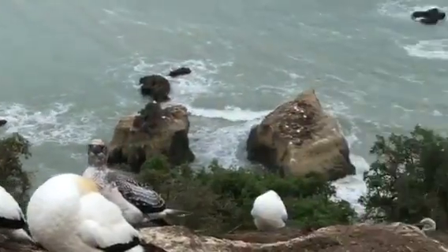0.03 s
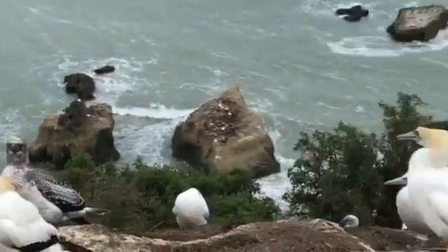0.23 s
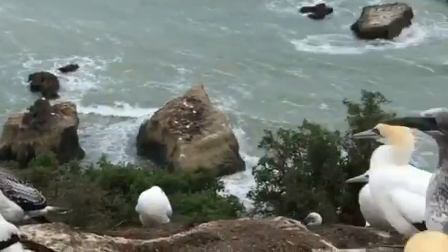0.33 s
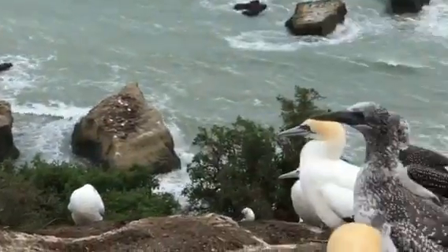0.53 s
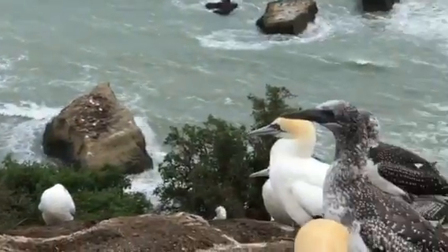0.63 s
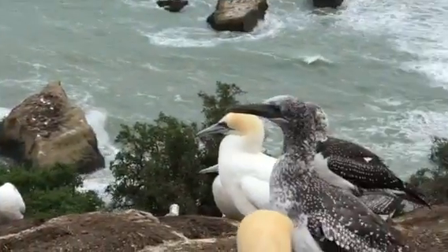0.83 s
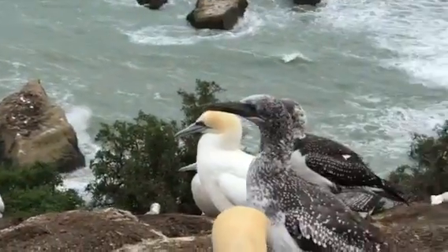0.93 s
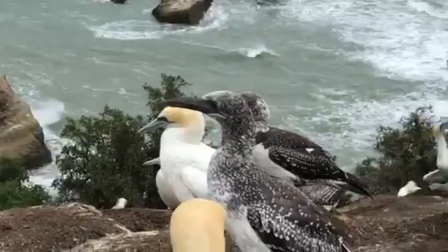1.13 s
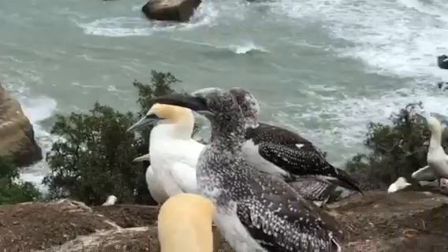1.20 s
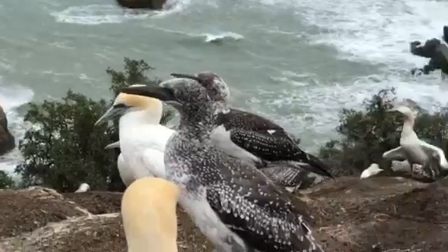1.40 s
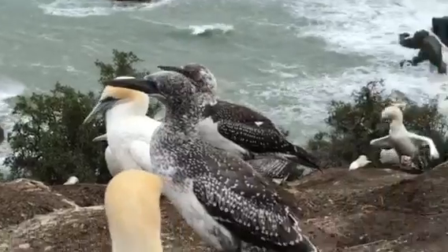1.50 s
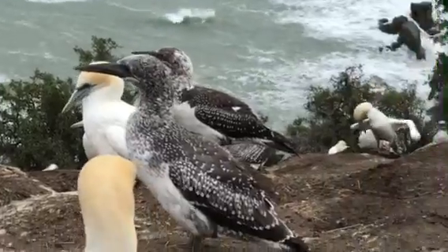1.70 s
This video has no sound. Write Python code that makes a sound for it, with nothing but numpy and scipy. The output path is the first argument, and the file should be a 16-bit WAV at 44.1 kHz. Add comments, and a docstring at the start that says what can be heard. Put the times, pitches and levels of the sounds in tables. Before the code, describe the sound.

Seabirds call close by in a colony for under two seconds. A bill clacks at 0.1 seconds, a croak follows at 0.2, then short harsh yaps come about every 0.3 seconds. Another bird peeps thinly five or six times a second, among pips and dry rasps. Wind rumbles on the microphone, thumping and popping most around 0.7 and 1.0 to 1.2 seconds. Faint surf and far birds continue throughout.

```python
"""A near seabird croaks and yaps in a clifftop colony, while another repeats a thin arched peep.
Neighbours add short pips, dry rasps and bill clacks over the babble of far birds.
Each call is a buzz from the bird's voice box, mixed with breath and shaped by its throat.
Behind the birds, surf washes far below and wind rumbles, thumps and pops on the microphone."""
import sys
import numpy as np
from scipy import signal
from scipy.fft import rfft, irfft
from scipy.io import wavfile
from scipy.ndimage import uniform_filter1d

SR = 44100
rng = np.random.default_rng(int(sys.argv[2]) if len(sys.argv) > 2 else 0)


def unload_audio(sound):
    """Save the sound as a 16-bit wav file, at the path given as the first command line argument."""
    columns = np.transpose(np.atleast_2d(sound))
    # keep every value between -1 and 1, then stretch to whole-number steps
    steps = np.round(np.clip(columns, -1, 1) * 32767)
    wavfile.write(sys.argv[1], SR, steps.astype(np.int16))


N = 77175

# The near bird's yaps: start t/s, length t/s, first pitch f/Hz, last pitch f/Hz, level/dB,
# treble tilt/(dB per octave), even harmonics/dB, roughness/(0-1), top sheen/dB, fade-out t/s
YAP_NOTES = [(0.232, 0.046, 919, 850, -42, 4, -0.5, 0.17, -8, 0.0065),
             (0.450, 0.06, 965, 989, -35.5, 8, 7.5, 0.08, -3.5, 0.012),
             (0.747, 0.033, 1069, 1039, -45, 2.5, 3, 0.05, 3, 0.011),
             (.988, 0.059, 1027, 952, -41.5, -4, 0, 0.18, -6, .011),
             (1.278, 0.059, 929, 822, -36, -1, 2.5, 0.14, 8.5, 0.027),
             (1.594, 0.023, 1014, 1036, -39.5, -3.5, -4, 0.27, 0, .006),
             (1.661, 0.017, 1103, 1126, -39.5, -17, -18, 0.33, 0, .006)]
# Arched peeps: start t/s, length t/s, top pitch f/Hz, level/dB
PEEP_NOTES = [(0.032, 0.054, 2270, -44), (0.201, 0.058, 2266, -41.5), (0.381, 0.056, 2234, -45),
              (0.558, 0.062, 2233, -46), (0.733, 0.056, 2200, -49.5), (0.922, 0.051, 2208, -50),
              (1.096, .053, 2230, -46), (1.28, 0.043, 2250, -44), (1.456, 0.059, 2260, -47),
              (1.64, 0.057, 2230, -43)]
# Neighbours' pips: start t/s, length t/s, first pitch f/Hz, last pitch f/Hz, level/dB,
# treble tilt/(dB per octave), even harmonics/dB, roughness/(0-1)
PIP_NOTES = [(.007, 0.022, 1855, 1756, -42, 14, -9, 0.45), (0.027, 0.027, 1985, 1882, -37, 12, -2, 0.16),
             (.09, 0.025, 1937, 1850, -40.5, -12, 7, 0.14), (0.157, 0.027, 1802, 1840, -33, 9, 4, 0.16),
             (0.561, 0.024, 1840, 1610, -36, 4, 4.5, 0.24), (0.612, 0.038, 2040, 1825, -48, -19, -3, 0.42),
             (0.641, 0.011, 1820, 1776, -40, 3.5, 25, 0.12),
             (0.703, 0.029, 1733, 1834, -39.5, -2, 17.5, 0.2),
             (1.073, 0.027, 2367, 2510, -44, -8, -8, 0.57), (1.096, .025, 2014, 1877, -37.5, -2, 10, 0.26),
             (1.161, .031, 1992, 1810, -37, -6, 12, 0.24), (1.577, 0.024, 1532, 1580, -35.5, -2, 9, 0.05)]
# Dry rasps: start t/s, length t/s, level/dB, treble tilt/(dB per octave)
RASP_NOTES = [(0.027, 0.023, -45, -4.5), (0.071, 0.026, -40, -6), (0.089, 0.027, -45.5, 2),
              (0.14, 0.016, -38.5, -5.5), (0.21, 0.024, -49, 10), (0.258, .019, -51, -6),
              (0.444, 0.011, -39, -15), (0.494, 0.011, -47.5, 12), (.536, .03, -46, -2.5),
              (1.145, .018, -44, -14), (1.232, 0.017, -41, -12.5), (1.585, .014, -50, 2.5),
              (1.658, .023, -48, -6.5), (1.683, 0.026, -46, -23)]
# Bills snapping shut: start t/s, level/dB
BILL_CLACKS = [(.078, -31.5), (0.141, -51)]
# How the throat colours each kind of call: f/Hz, relative level/dB
CROAK_COLOUR = [(480, -31), (950, -13.5), (1420, 0), (1900, -10.5), (2380, -34), (2850, -13), (3350, -18),
                (4100, -29), (5100, -20), (6200, -24.5), (7500, -32), (10000, -41.5), (15500, -56)]
YAP_COLOUR = [(450, -18), (950, -1.5), (1850, 1.5), (2850, -6.5), (3500, -8), (3950, -7), (4550, -22),
              (5400, -17), (6900, -22), (7800, -35.5), (8600, -28), (9900, -37), (10800, -44.5),
              (12800, -39), (15500, -62)]
PEEP_COLOUR = [(1000, -27), (1650, -1.5), (2200, -4.5), (3300, -1.5), (3800, -10), (4500, -22),
               (5400, -8.5), (6700, -35), (9000, -48), (13400, -38), (15500, -52)]
PIP_COLOUR = [(900, -29), (1550, 4.5), (2000, 10.5), (3500, -15), (5400, -21), (7300, -40.5), (15500, -65)]
RASP_COLOUR = [(500, -16), (900, -3.5), (1150, -39), (1500, 7.5), (1900, -9.5), (2600, -12), (3700, -9.5),
               (4800, -18), (6200, -14.5), (8000, -20), (10500, -37.5), (15500, -52)]
# How loud a typical far call is over time: t/s, level/dB
BABBLE_LEVELS = [(0, -57.5), (.35, -57.5), (.85, -60), (1.25, -56), (1.75, -55.5)]
# How hard the wind presses on the microphone: t/s, level/dB
WIND_LEVELS = [(0, -37), (.18, -37.5), (0.209, -30.5), (.35, -28.5), (0.638, -24), (0.678, -18.5),
               (.73, -25), (.79, -37.5), (.84, -37.5), (0.881, -23), (.94, -34), (1.02, -32),
               (1.108, -21.5), (1.16, -26.5), (1.232, -21), (1.25, -38), (1.35, -29.5), (1.55, -29.5),
               (1.59, -38.5), (1.75, -36)]
# The tone of the wind's rumble: f/Hz, relative level/dB
RUMBLE_COLOUR = [(20, -10), (38, -28.5), (55, 1.5), (85, -2.5), (130, -4), (220, -11), (320, -25),
                 (500, -37), (1000, -42.5), (3000, -91)]
# Thumps of wind: start t/s, length t/s, level/dB, treble cutoff f/Hz
WIND_THUMPS = [(.512, 0.037, -27.5, 412), (.6, 0.02, -29, 277), (0.668, 0.024, -14.5, 199),
               (0.688, 0.043, -24.5, 306), (0.808, 0.023, -34, 262), (0.879, 0.027, -32, 166),
               (1.006, 0.022, -26.5, 230), (1.05, 0.03, -19.5, 186), (1.192, 0.038, -28.5, 306),
               (1.221, 0.018, -27, 210), (1.35, 0.046, -27.5, 253), (1.395, 0.019, -29.5, 380),
               (1.469, 0.017, -35.5, 372)]
# Sharp pops of wind: middle t/s, peak level/dB, width t/s
WIND_POPS = [(0.672, -11, 0.0013), (.694, -17.5, 0.00027), (1.188, -17.5, 0.00037), (1.225, -22.5, 0.00035),
             (1.237, -17.5, 0.001)]
# The tone of the surf: f/Hz, relative level/dB
SURF_COLOUR = [(40, -22.5), (250, 7), (500, 3.5), (900, -6), (1300, -2.5), (2000, -20), (2800, -13),
               (3800, -14.5), (7000, -26.5), (10000, -37), (15500, -45.5)]

ATTACK_S, RELEASE_S = 0.0064, 0.0068  # a note's usual fade-in and fade-out
TREBLE_HZ, SHEEN_HZ, EDGE_HZ = 3100, 9900, 15750  # where treble starts, sheen starts and sound ends


def croak(start=.203, length=.043, peak_s=0.013):
    """A loud note at about half the pitch of a yap, which peaks early and dies away."""
    note = call(CROAK_COLOUR, length, first_hz=476, last_hz=467.6, db=-28.5, rough=0.12)
    t = np.arange(len(note)) / SR
    return start, note * amp(-12 * abs(t - peak_s) / t[-1])


def call(throat, length, first_hz, last_hz, db, tilt_db=0, even_db=0, rough=0, sheen_db=0,
         release=RELEASE_S, attack=ATTACK_S):
    """One short note, such as a yap, that slides from one pitch to another."""
    hz = np.linspace(first_hz, last_hz, int(length * SR))
    return amp(db) * voice(hz, throat, rough, tilt_db, even_db, sheen_db, release, attack)


def voice(hz, throat, rough, tilt_db=0, even_db=0, sheen_db=0, release=RELEASE_S, attack=ATTACK_S):
    """The voice box (syrinx) vibrates unsteadily and lets out puffs of air; the throat colours both."""
    n = len(hz)
    colour = lambda f: amp(level_at(throat, f) + tilt_db * np.log2(np.hypot(1, f / TREBLE_HZ)))
    wobble = lambda seconds: noise(lambda f: 1 / (1 + (f * seconds) ** 2))[:n]
    hz = hz * (1 + (.002 + 0.053 * rough) * wobble(seconds=0.0023))  # rough voices shake more
    phase = 2 * np.pi * np.cumsum(hz) / SR
    k = np.arange(1, 33)[:, None]  # harmonics: whole multiples of the pitch
    harmonic_hz = k * hz
    envelope = fade(np.arange(n) / SR, attack, release)
    # A note is brightest where the effort peaks; its ends lose treble.
    effort = envelope * np.sin(np.pi * np.linspace(0, 1, n))
    dull_db = 10.5 * (effort - 1) * np.log2(np.maximum(harmonic_hz / TREBLE_HZ, 1))
    top_db = sheen_db / (1 + (SHEEN_HZ / harmonic_hz) ** 20)
    shade_db = even_db * (k % 2 == 0) + dull_db + top_db
    strength = colour(harmonic_hz) * amp(shade_db) * (harmonic_hz < EDGE_HZ)
    buzz = (strength * np.cos(k * phase + rng.uniform(0, 2.24, k.shape))).sum(0)
    breath = noise(colour)[:n] * (1 + .5 * np.cos(phase))  # one puff per vibration
    breath *= amp(1.6 * wobble(seconds=0.005))  # the air sputters unevenly
    return unit((1 - rough) * unit(buzz) + rough * unit(breath)) * envelope


def peep(length, top_hz, db):
    """A thin note that arches, sags and breaks downward into a hoarse end."""
    top_at, break_at = 0.306, 0.74  # shares of the note's length
    progress = np.linspace(0, 1, int(length * SR))
    rise = 0.032 * (1 - progress / top_at) ** 2
    sag = 0.2022 * ((progress - top_at) / (1 - top_at)) ** 2
    broken = np.clip((progress - break_at) / .08 + .5, 0, 1)
    hz = top_hz * (1 - np.where(progress < top_at, rise, sag) - 0.1448 * broken)
    return amp(db) * voice(hz, PEEP_COLOUR, rough=0.037 + .5 * broken)


def pip(length, *settings):
    """A short high note that swells for about half its length, then fades."""
    return call(PIP_COLOUR, length, *settings, attack=.52 * length, release=.45 * length)


def rasp(length, db, tilt_db, hz=471):
    """A low, dry note that is about half breath."""
    return call(RASP_COLOUR, length, hz, hz, db, tilt_db, rough=0.54)


def clack(db, decay_s=0.00087):
    """The snap of a bill, ringing briefly in the mouth."""
    t = np.arange(SR // 100) / SR
    snap = noise(lambda f: amp(level_at(RASP_COLOUR, f) - 2 * np.log2(1 + f / TREBLE_HZ)), len(t))
    return amp(db) * snap * np.exp(-t / decay_s)


def near_birds():
    """The croak, yaps, pips, peeps, rasps and bill clacks, each at its own time."""
    out = np.zeros(N)
    add(out, *croak())
    for start, *settings in YAP_NOTES:
        add(out, start, call(YAP_COLOUR, *settings))
    for sound, table in (pip, PIP_NOTES), (peep, PEEP_NOTES), (rasp, RASP_NOTES), (clack, BILL_CLACKS):
        for start, *settings in table:
            add(out, start, sound(*settings))
    return out


def ground_echo(sound, echo_db=-20.5, decay_s=0.24):
    """Adds the weak, short echo that scatters back from rock and bushes."""
    t = np.arange(SR // 4) / SR
    echoes = rng.standard_normal(len(t)) * amp(-60 * t / decay_s) * (t > .003)
    return sound + amp(echo_db) * signal.fftconvolve(sound, echoes / np.linalg.norm(echoes))[:N]


def babble(calls_per_s=50, length=0.0514, low_hz=704.5, high_hz=1160, spread_db=3):
    """Faint hoarse yaps from all over the colony, with a lull in the middle."""
    out = np.zeros(N)
    for i, (when, pitch, loudness) in enumerate(rng.random((int(calls_per_s * N / SR), 3))):
        start = (i + when) / calls_per_s
        hz = low_hz + pitch * (high_hz - low_hz)
        db = np.interp(start, *np.transpose(BABBLE_LEVELS)) + spread_db * (2 * loudness - 1)
        add(out, start, call(YAP_COLOUR, length, hz, .92 * hz, db, tilt_db=-3.5, even_db=3, rough=0.45))
    return out


def wind():
    """Wind presses on the microphone: a rumble that rises and falls, with thumps and pops."""
    rumble = noise(lambda f: amp(level_at(RUMBLE_COLOUR, f)), N)
    rumble /= np.sqrt(uniform_filter1d(rumble ** 2, size=2600) + 0.042)  # even out chance swells
    out = rumble * amp(np.interp(np.arange(N) / SR, *np.transpose(WIND_LEVELS)))
    for start, *settings in WIND_THUMPS:
        add(out, start, thump(*settings))
    for row in WIND_POPS:
        add(out, *pop(*row))
    return out


def thump(length, db, cutoff_hz, low_hz=78.5):
    """A sudden swirl of air hits the microphone with a burst of low noise."""
    t = np.arange(int(length * SR)) / SR
    swirl = noise(lambda f: f ** 2 / (f ** 2 + low_hz ** 2) / np.hypot(1, (f / cutoff_hz) ** 3.18))
    return amp(db) * unit(swirl[:len(t)] * fade(t, attack=0.0029, release=length / 3))


def pop(middle, db, width):
    """One quick swing of pressure as a small swirl crosses the microphone."""
    t = np.arange(SR // 50) / SR
    offset = (t - t.mean()) / width
    return middle - t.mean(), amp(db) * offset * np.exp((1 - offset ** 2) / 2)


def surf(db=-47.5):
    """The smooth wash of the sea far below."""
    return amp(db) * noise(lambda f: amp(level_at(SURF_COLOUR, f)), N)


def amp(db):
    """Turns decibels into a number to multiply by."""
    return 10 ** (np.asarray(db) / 20)


def unit(x):
    """Scales a sound to an average (rms) size of 1."""
    return x / np.sqrt(np.mean(x ** 2) + 1e-20)


def level_at(colour, hz):
    """Looks up a colour table's level in dB at any frequency."""
    f, db = np.transpose(colour)
    return np.interp(np.log(hz + 1), np.log(f), db)


def add(mix, start, sound):
    """Mixes a sound in at a start time in seconds."""
    part = mix[max(round(start * SR), 0):][:len(sound)]
    part += sound[:len(part)]


def noise(gain, size=8192):
    """Noise with each frequency f made louder or softer by gain(f)."""
    spectrum = rfft(rng.standard_normal(size))
    return unit(irfft(spectrum * gain(np.fft.rfftfreq(size, 1 / SR)), size))


def fade(t, attack, release):
    """A loudness shape that rises smoothly, holds and falls."""
    rise = np.sin(np.pi / 2 * np.clip(t / attack, 0, 1))
    fall = np.sin(np.pi / 2 * np.clip((t[-1] - t) / release, 0, 1))
    return rise * fall


def scene():
    """Birds over surf and wind, in one channel."""
    return (surf() + wind() + ground_echo(near_birds()) + babble())[None]


def record(dry):
    """Cuts off the highest treble, above EDGE_HZ."""
    low_pass = signal.firwin(511, EDGE_HZ, window=("kaiser", 9), fs=SR)
    return signal.oaconvolve(dry, low_pass[None], "same")


dry = scene()
out = record(dry)
unload_audio(out)
```